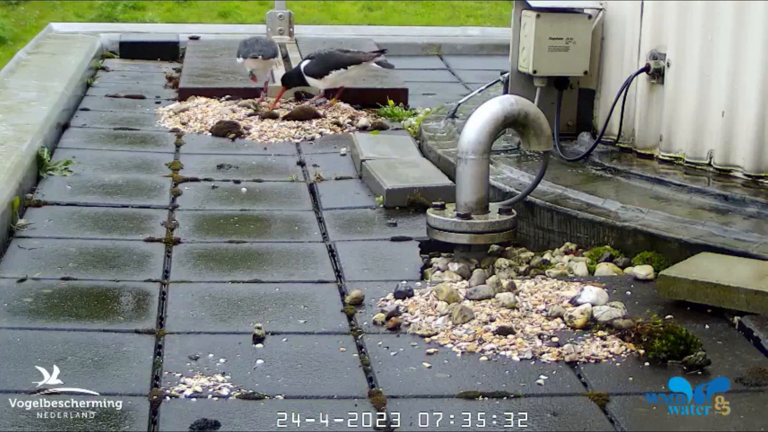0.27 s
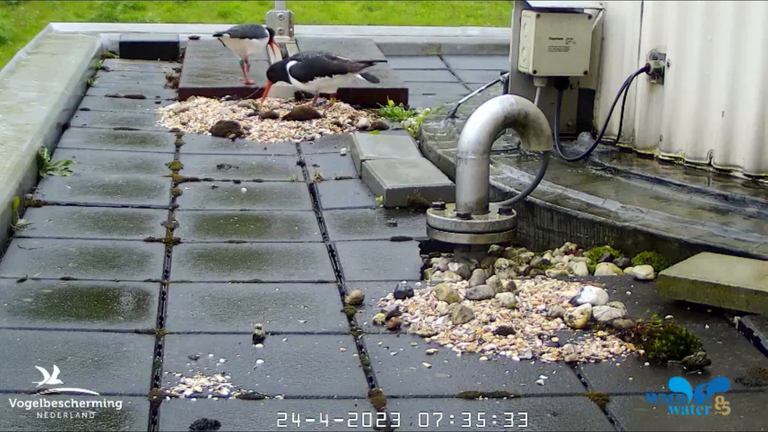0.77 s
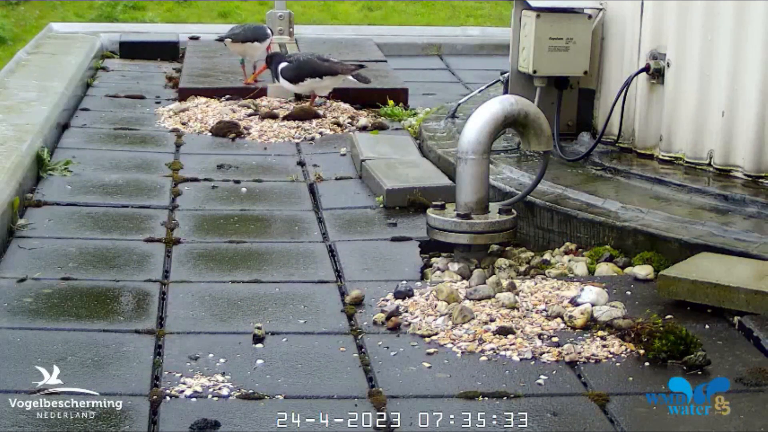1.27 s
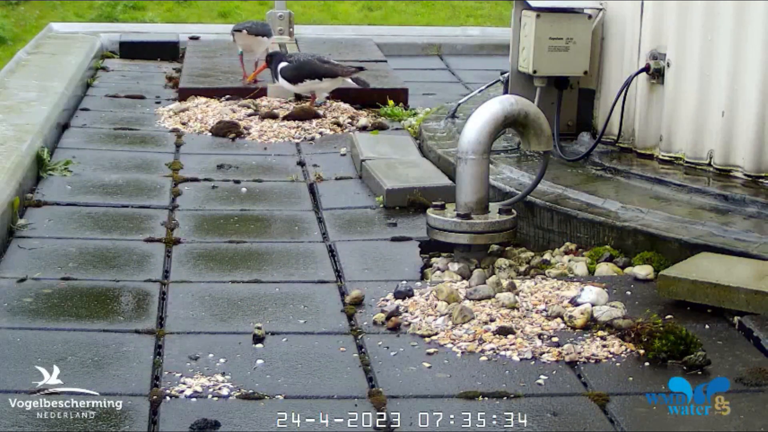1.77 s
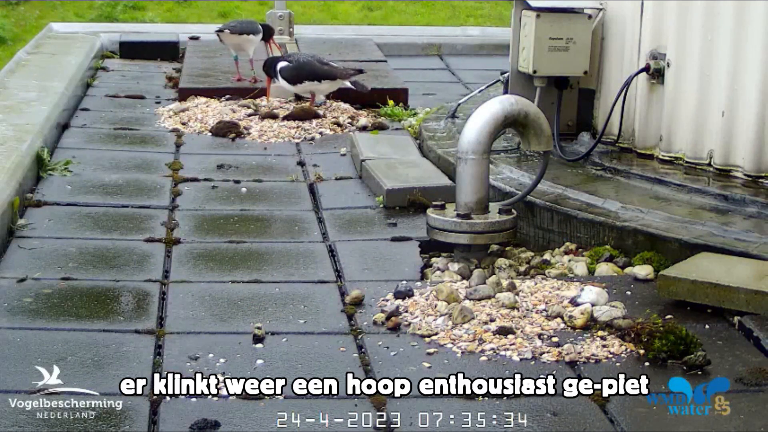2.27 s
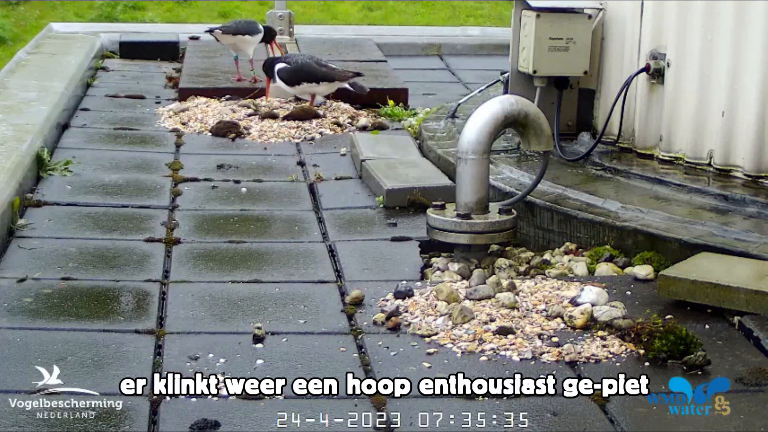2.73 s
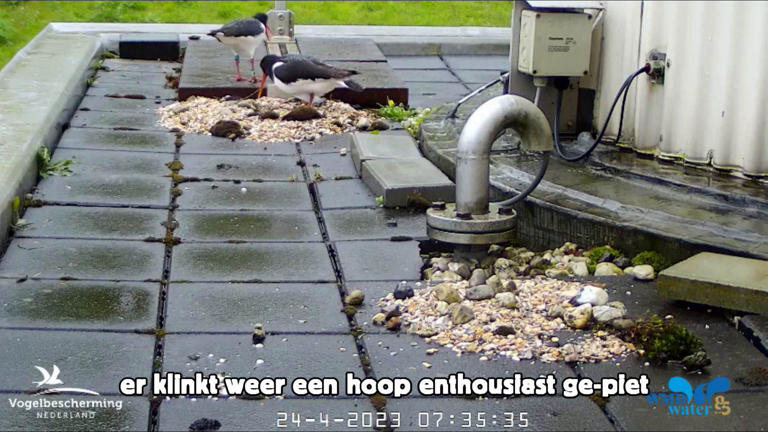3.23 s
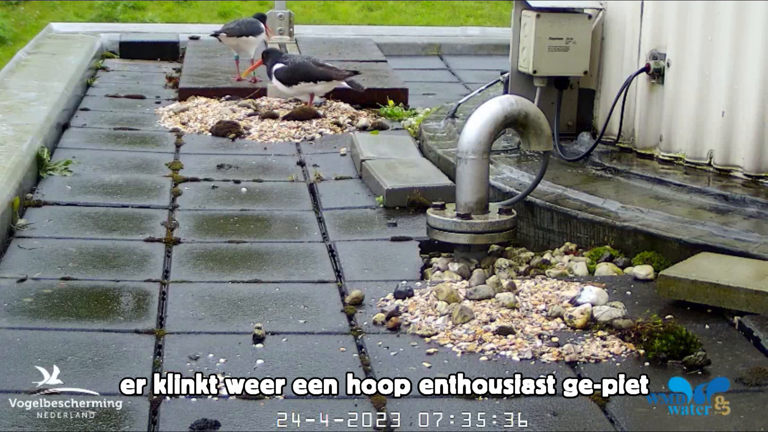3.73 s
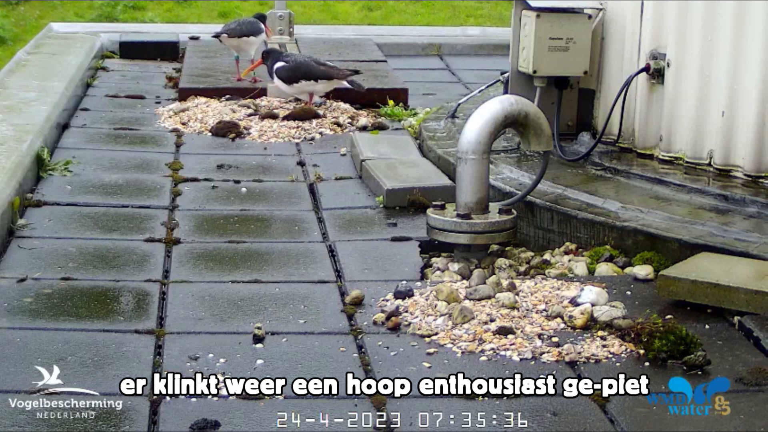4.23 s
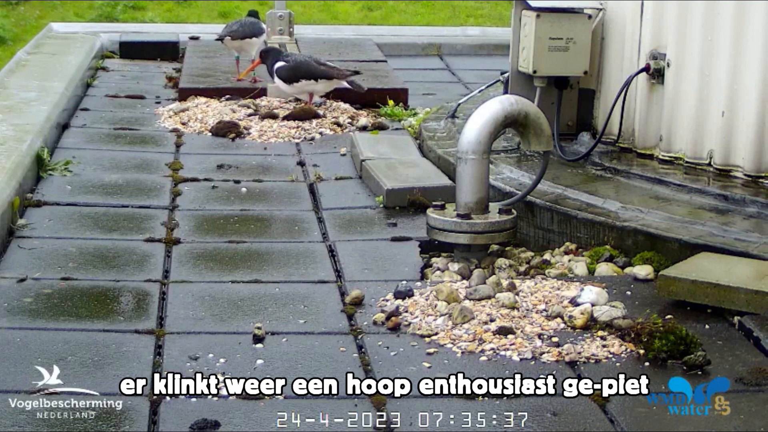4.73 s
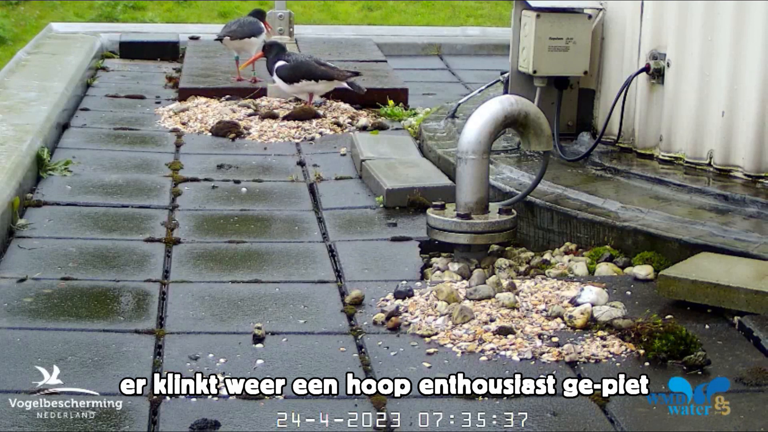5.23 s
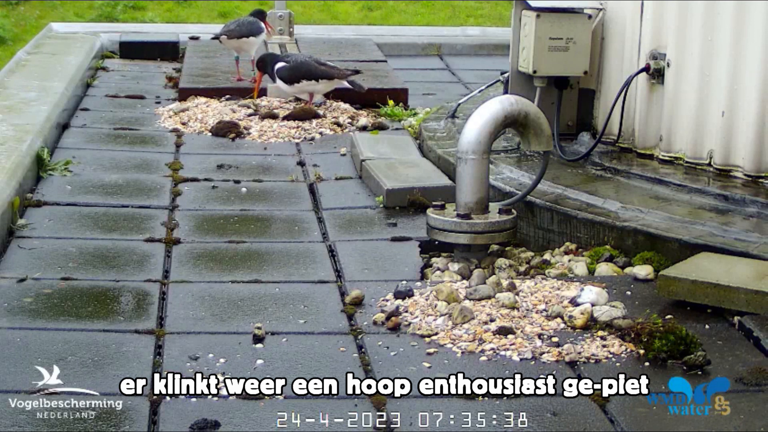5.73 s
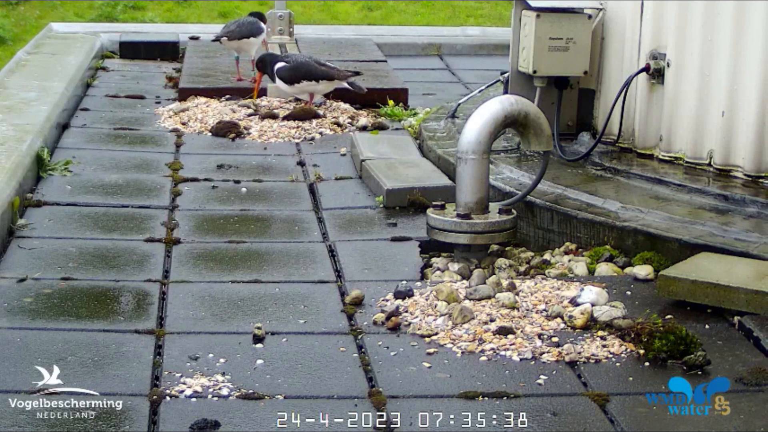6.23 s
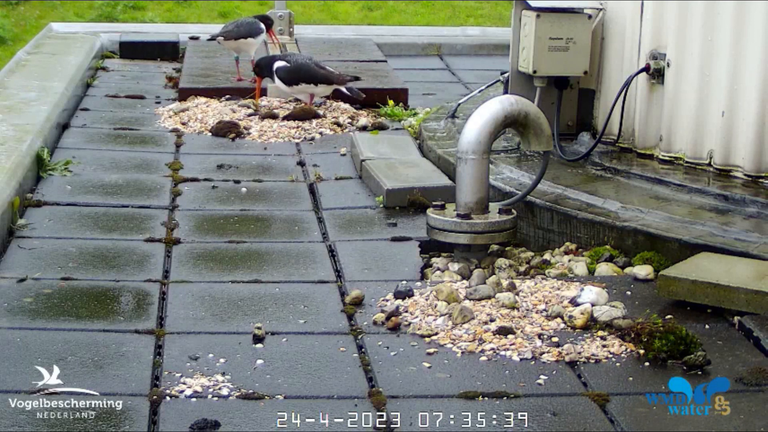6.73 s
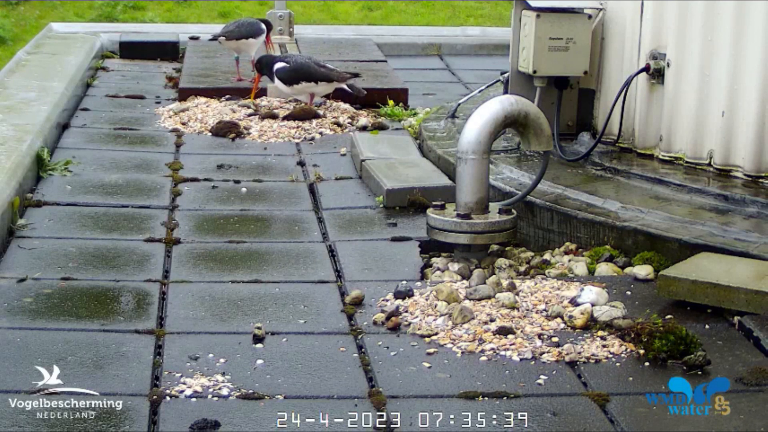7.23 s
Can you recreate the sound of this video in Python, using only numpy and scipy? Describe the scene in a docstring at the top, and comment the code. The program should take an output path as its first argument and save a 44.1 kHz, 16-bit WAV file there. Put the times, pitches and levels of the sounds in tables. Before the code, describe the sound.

Two oystercatchers pipe in frantic, shrill, reedy trills on an open paved roof, bursting into loud whistled peeps over faint traffic rumble.

```python
"""Oystercatchers piping on a roof

Two oystercatchers pipe at their nest on a flat paved roof, about fifteen notes a second.
Each pip is a stack of reedy overtones that scoops up and climbs; many flip into a loud, falling, whistled peep.
A wall, a parapet and scattered surfaces answer with short, delayed copies; grit ticks through a resonance.
Small birds are thin gliding tones, and traffic and air are shaped noise with a swelling rumble.
The treble ends near 8 kHz, with a faint mirror image just above."""
import sys
import numpy as np
from scipy import signal
from scipy.fft import rfft, irfft
from scipy.io import wavfile

SR = 44100
rng = np.random.default_rng(int(sys.argv[2]) if len(sys.argv) > 2 else 0)


def output_pcm(signal):
    """Save a mono or channel-first signal as 16-bit PCM at the path in sys.argv[1].

    Samples are clipped to [-1, 1] before scaling.
    """
    pcm = np.clip(np.atleast_2d(signal).T, -1, 1) * 32767
    wavfile.write(sys.argv[1], SR, np.round(pcm).astype(np.int16))


N = 330750  # length of the scene [samples]

# Colour of traffic and air: (frequency [Hz], relative level per Hz [dB])
AIR_SPECTRUM = [(20, -9.5), (40, -9), (60, -7), (115, 2.5), (200, -3.5), (300, -6), (480, -12.5),
                (700, -10.5), (1050, -17), (2000, -19.5), (3500, -26), (6000, -34.5), (7500, -34.5),
                (9000, -59)]
AIR_DB = -43  # level of the steady noise
# Swelling of the rumble, used relative to its average: (time [s], level [dB])
RUMBLE_SWELL = [(0.0, -42.5), (0.23, -40), (0.31, -47.5), (0.81, -40.5), (0.85, -49.5), (1.11, -43.5),
                (1.65, -45), (1.77, -37.5), (1.88, -46), (3.3, -47), (3.36, -43.5), (4.05, -46.5),
                (4.11, -41), (4.3, -48.5), (4.43, -38), (4.51, -46), (7.48, -44.5), (7.5, -48.5)]

# Thin whistles of small birds further off:
# (time [s], length [s], start pitch [Hz], end pitch [Hz], level before flutter [dB])
FAR_WHISTLES = [(0.11, .1, 7670, 6900, -63.5), (0.318, 0.27, 7630, 6800, -57.5),
                (.77, 0.14, 3740, 3740, -56), (1.598, 0.084, 3730, 3600, -50),
                (6.265, 0.2, 7400, 7250, -60.5), (6.453, 0.1, 7360, 6260, -59),
                (7.093, 0.37, 7450, 7100, -62)]

# Grit and shell pieces tapped by a bill: (time [s], peak level [dB], ring frequency [Hz])
GRIT_TICKS = [(0.064, -38, 5640), (3.414, -44, 5100), (5.629, -40, 2000), (5.852, -26, 6700),
              (6.346, -28, 2900), (7.002, -40, 6470)]

# Scattered echoes from paving, parapet and buildings: (delay [s], relative level [dB])
SCATTER_CURVE = [(.009, 8), (0.014, 2.5), (0.024, -5.5), (0.044, -17.5), (.065, -10.5), (0.086, -22),
                 (.16, -23.5), (.35, -44.5)]
SCATTER_DB = -17.5
WALL_S, WALL_DB, WALL_HZ = 0.0056, -8, 4000  # echo delay, level, and where its treble begins
PARAPET_S, PARAPET_DB = 0.0055, -7

# Plain notes that stay in the low voice:
# (time [s], length [s], top pitch [Hz], level before throat and swell [dB])
PLAIN_PIPS = [(-.008, 0.023, 1697, -35.5), (0.0536, 0.025, 1614, -31.5), (0.118, 0.026, 1595, -34.5),
              (0.1736, .023, 1570, -34), (0.2286, 0.018, 1665, -33.5), (0.345, 0.019, 1690, -34.5),
              (0.557, .022, 1695, -33.5), (.8545, 0.022, 1726, -32.5), (3.333, 0.016, 1730, -30.5),
              (3.382, .028, 1680, -31.5), (3.4443, 0.029, 1647, -31), (4.302, .022, 1680, -32.5),
              (4.3557, .018, 1630, -31), (4.5297, 0.023, 1760, -28.5), (4.5904, 0.026, 1696, -30.5),
              (4.72, 0.036, 1737, -30), (5.0178, 0.044, 1730, -27.5), (5.114, 0.032, 1615, -30),
              (5.297, .044, 993, -35.5), (5.3696, .029, 1724, -31), (5.432, 0.027, 1613, -30.5),
              (5.5018, 0.033, 1740, -30), (5.585, 0.032, 1594, -31), (5.6554, 0.03, 1730, -29.5),
              (5.7208, .03, 1586, -30.5), (5.887, 0.032, 1590, -30), (5.949, 0.058, 1614, -32),
              (6.1025, 0.027, 1316, -30.5), (6.178, 0.03, 1410, -30), (6.246, 0.053, 1610, -29.5),
              (6.394, 0.028, 1357, -34.5), (6.462, 0.024, 1377, -33.5), (6.524, 0.03, 1357, -35),
              (6.595, 0.033, 1361, -35), (6.676, 0.028, 1333, -32.5), (6.7513, 0.031, 1431, -33),
              (6.821, 0.036, 1349, -32), (6.895, .026, 1547, -28.5), (6.9476, 0.029, 1405, -32),
              (7.022, .028, 1408, -33.5), (7.0914, 0.049, 1637, -30), (7.1907, 0.028, 1703, -30),
              (7.254, 0.056, 1633, -30.5), (7.3647, 0.02, 1520, -32)]
# Throat and bill in the low voice: (frequency [Hz], gain [dB])
THROAT_GAIN = [(900, -8.5), (1400, 0), (2000, 0), (2700, 6), (3200, 3), (3700, -6), (4100, -0.2),
               (4500, -10), (5000, -18), (5500, -8.5), (6200, -23), (7200, -20.5), (8500, -39)]
# The low voice brightens and dulls as the birds turn and bow:
# (time [s], brightness [dB per octave], lift of the second harmonic [dB])
PIP_BRIGHTNESS = [(.05, -15, 6), (.25, -4, -3.5), (.42, 1.5, -4.5), (.6, -5, -3), (1, -0.5, -4),
                  (1.2, -11, 2.5), (1.5, -3.5, -5.5), (1.75, -13, 4), (2.1, 2, -3.5), (2.4, -1.5, 2),
                  (3, 2.8, -1.5), (3.15, -6, -1), (4.3, -5.5, -1.5), (4.88, -7.5, -1.5), (5.12, -2, -2),
                  (5.18, -3, -0.5), (5.3, -10, 5.5), (5.36, -1.5, -1), (5.7, -1, -2), (5.95, -2.5, -2.5),
                  (6.04, -8, -5), (6.11, -2, -3.5), (6.18, -4, -5.5), (6.25, -1.5, 1.5), (6.39, 1, 3),
                  (6.74, -1, 1), (6.83, -3, -5.5), (7.02, 1, -3.5), (7.28, -2, -4.5), (7.38, -16, 0)]
# How the low voice is held: (time [s], resting pitch [Hz], share of a plain pip passed at its top [0 to 1])
PIP_POSTURE = [(0, 1376, 0.73), (.9, 1416, 0.74), (1.2, 1446, .65), (3.4, 1474, 0.61), (4.6, 1432, 0.55),
               (5.2, 1464, 0.53), (5.3, 821, 0.67), (5.36, 1433, .55), (5.75, 1437, 0.55),
               (6.25, 1397, 0.67), (6.39, 1360, .48), (7.02, 1400, 0.58), (7.09, 1437, 0.7),
               (7.25, 1330, 0.71), (7.45, 1400, 0.54)]
# The pip that leads into a peep:
# (time [s], level before throat and swell [dB], pitch at which the voice flips [Hz])
LEAD_IN_PIPS = [(.3, -34, 1847), (1, -32, 1808), (1.3, -32, 1740), (1.75, -29.5, 1890), (2.05, -26.5, 1950),
                (2.3, -31.5, 1723), (3, -30, 1805), (3.6, -30, 1756), (3.85, -26, 1880), (4.2, -28, 1774),
                (4.45, -31, 1790), (4.85, -21.5, 1970), (5.22, -30, 1764), (5.82, -29.5, 1850),
                (6.06, -25, 2040), (7.4, -23, 1990)]
LEAD_IN_CREST = 0.92  # a pip that leads into a peep climbs almost to its end
CLIMB_S = 0.01012  # time scale of the climb from resting pitch to top
WAKE_S = 0.002  # the membranes stir faintly this long before a pip speaks

# Notes that flip from a pip into a peep:
# (time of the flip [s], how long before the flip its pip begins [s], peep length [s],
#  peep pitch [Hz], peep level [dB])
FLIPPED_PEEPS = [(.302, 0.018, 0.013, 2344, -26.5), (.417, 0.017, 0.013, 2350, -30),
                 (0.47, 0.019, 0.0078, 2420, -28.5), (0.519, .014, 0.011, 2350, -29.5),
                 (0.634, 0.018, 0.013, 2340, -38), (0.695, 0.024, 0.0051, 2280, -34),
                 (.751, 0.018, 0.0093, 2410, -30), (0.812, 0.019, .012, 2340, -33.5),
                 (0.937, .019, 0.0085, 2380, -29), (0.989, 0.013, .014, 2510, -25),
                 (1.0492, 0.015, 0.016, 2450, -27), (1.1085, 0.014, 0.014, 2570, -25.5),
                 (1.165, 0.013, 0.016, 2567, -26), (1.2193, 0.01, 0.022, 2552, -27.5),
                 (1.2786, .01, 0.024, 2550, -27), (1.3392, 0.016, 0.024, 2560, -28.5),
                 (1.4032, 0.013, 0.0082, 2466, -25), (1.4583, 0.013, .011, 2516, -25.5),
                 (1.5118, 0.011, .013, 2520, -24), (1.5704, 0.012, 0.016, 2507, -25),
                 (1.629, .01, 0.016, 2521, -22), (1.688, 0.011, 0.018, 2523, -23.5),
                 (1.7464, 0.0094, 0.014, 2480, -21), (1.803, 0.0085, .023, 2515, -23.5),
                 (1.866, 0.0077, 0.028, 2505, -23.5), (1.946, 0.018, 0.0061, 2000, -32.5),
                 (2.005, 0.019, 0.0046, 2150, -39), (2.0593, 0.017, .012, 2490, -24),
                 (2.116, 0.015, 0.016, 2510, -25), (2.1758, 0.015, 0.013, 2480, -21.5),
                 (2.243, 0.016, 0.015, 2520, -19.5), (2.3073, 0.012, 0.019, 2470, -20),
                 (2.373, .013, 0.014, 2533, -20.5), (2.434, 0.014, 0.018, 2477, -19),
                 (2.5036, 0.013, 0.017, 2512, -20), (2.572, 0.013, 0.015, 2553, -19.5),
                 (2.6374, 0.014, 0.02, 2572, -19), (2.709, 0.012, 0.013, 2495, -18.5),
                 (2.77, 0.012, .015, 2534, -21.5), (2.836, 0.014, 0.014, 2507, -18.5),
                 (2.897, 0.014, 0.014, 2532, -19), (2.9606, 0.014, .0126, 2510, -19),
                 (3.0225, 0.013, 0.02, 2608, -23.5), (3.093, .015, 0.012, 2496, -25),
                 (3.1532, 0.016, 0.016, 2140, -34.5), (3.2124, 0.017, 0.011, 2350, -28.5),
                 (3.276, 0.021, .013, 2442, -22.5), (3.5284, 0.016, 0.013, 2140, -30.5),
                 (3.6034, 0.028, 0.012, 2160, -34), (3.807, 0.0092, 0.02, 2310, -24),
                 (3.853, 0.0062, .017, 2326, -24.6), (3.9222, 0.012, 0.019, 2530, -23.5),
                 (4.005, 0.013, .0146, 2412, -23), (4.0695, 0.012, 0.027, 2507, -23.5),
                 (4.1628, .013, 0.013, 2414, -22), (4.232, 0.018, .0165, 2406, -23),
                 (4.452, 0.028, 0.02, 2390, -24), (4.6746, .012, .015, 2398, -18.5),
                 (4.8174, 0.0084, 0.017, 2187, -21.5), (4.889, 0.0089, 0.018, 2178, -20),
                 (4.957, 0.011, 0.015, 2210, -20), (5.214, 0.034, 0.013, 2040, -37),
                 (5.817, 0.027, 0.021, 2250, -30.5), (6.0582, 0.012, 0.01, 2140, -30.5),
                 (7.429, 0.01, 0.015, 2040, -22), (7.4907, 0.0067, 0.011, 2096, -23.5)]
# Overtones of a peep at the usual pitch: (time [s], second harmonic [dB], third harmonic [dB])
PEEP_OVERTONES = [(.3, -10, -21), (1.05, -9, -20.5), (1.2, -4, -19.5), (1.5, -9.5, -18.5),
                  (1.7, -15.5, -21), (1.87, -13.5, -15), (2.06, -10.5, -29.5), (2.6, -9.5, -23.5),
                  (2.85, -11.5, -29.5), (3.85, -12, -25.5), (4.07, -12, -22.5), (4.16, -15, -26.5),
                  (4.45, -14.5, -22.5), (4.7, -18.5, -40), (4.96, -18.5, -29), (5.8, -13, -27.5),
                  (7.45, -7.5, -5.5)]
# How far a peep falls before it ends: (time [s], share of its pitch [0 to 1])
PEEP_DROP = [(.3, 0.24), (.93, 0.22), (1, 0.099), (1.33, 0.12), (1.45, .17), (1.65, 0.14), (2.5, 0.15),
             (3.2, 0.19), (4.5, .16), (4.88, .08), (5.8, 0.17)]
USUAL_PEEP_HZ = 2450
SECOND_DB_PER_HZ, THIRD_DB_PER_HZ = 0.0189, 0.0653  # a higher peep is a shriller one
BREAK_S, LOUD_PEEP_DB = 0.0032, -20  # silence before a peep of this level; shorter before a softer one
PEEP_FADE_DB = 1.5  # a peep loses this much from its start to its end

# Low-rate sampling: how much passes at the top of the band: (frequency [Hz], gain [dB])
MIRROR_FILTER = [(7600, 0), (8000, -4), (8300, -8), (8600, -17), (9000, -33), (9400, -55)]
SAMPLING_HZ, INPUT_EDGE_HZ, CUTOFF_HZ = 16000, 7850, 9200


def from_db(db):
    """Turn decibels into gain."""
    return 10 ** (np.asarray(db) / 20)


def rms_one(x):
    """Scale a sound to an average strength (rms) of 1."""
    return x / np.sqrt(np.mean(x ** 2) + 1e-20)


def at_hz(points, hz):
    """Read a spectrum on a log-frequency axis."""
    freqs, levels = np.transpose(points)
    return np.interp(np.log(np.maximum(hz, 1)), np.log(freqs), levels)


def at_time(rows, s):
    """Read every column of a curve at the given time."""
    times, *columns = np.transpose(rows)
    return [np.interp(s, times, column) for column in columns]


def bins_hz():
    """Frequencies in a spectrum of the whole scene."""
    return np.arange(N // 2 + 1) * SR / N


def drift(rate):
    """Smooth random wandering with rms 1; a higher rate [Hz] makes it quicker."""
    smoothed = rfft(rng.standard_normal(N)) / (1 + (bins_hz() / rate) ** 2)
    return rms_one(irfft(smoothed, N))


def note_clock(start, length):
    """Samples of a note, its age in seconds and its progress from 0 to 1."""
    first = max(int(start * SR) + 1, 0)
    at = np.arange(first, min(int((start + length) * SR), N))
    age = at / SR - start
    return at, age, np.clip(age / length, 0, 1)


def phase_of(hz):
    """Add up a pitch curve into a running phase."""
    return 2 * np.pi * np.cumsum(hz) / SR


def delayed(x, delay_s):
    """The same sound, arriving later."""
    return np.interp(np.arange(N) - delay_s * SR, np.arange(N), x, left=0)


def air(surge_db=2.0, rumble_hz=330, swell_share=0.67):
    """Traffic and air: a steady hiss over a low rumble that swells and ebbs."""
    noise = irfft(rfft(rng.standard_normal(N)) * from_db(at_hz(AIR_SPECTRUM, bins_hz())), N)
    noise = rms_one(noise)
    rumble = signal.sosfilt(signal.butter(1, rumble_hz, fs=SR, output="sos"), noise)
    level_db, = at_time(RUMBLE_SWELL, np.arange(N) / SR)
    swell_db = swell_share * (level_db - level_db.mean()) + surge_db * drift(6.9)
    # only the change in the rumble is added, since the noise already holds it
    return from_db(AIR_DB) * (noise + rumble * (from_db(swell_db) - 1))


def small_birds(jitter=0.028, flutter_db=3.0, shrill_hz=7400):
    """Faint, fluttering whistles, level or slowly sinking; the shrill ones waver most."""
    out = np.zeros(N)
    waver, flutter = jitter * drift(230), flutter_db * drift(120)
    for start, length, first_hz, last_hz, db in FAR_WHISTLES:
        at, age, progress = note_clock(start, length)
        glide = first_hz + (last_hz - first_hz) * progress
        pitch = glide * (1 + waver[at] * (first_hz / shrill_hz) ** 2)
        swell = from_db(db + flutter[at]) * np.sin(np.pi * progress)
        out[at] += swell * np.sin(phase_of(pitch))
    return out


def ticks(decay_s=0.0013, sharpness=3.4):
    """Each tap on grit is a tiny crack of noise through one broad resonance."""
    out, noise = np.zeros(N), rng.standard_normal(N)
    for start, db, hz in GRIT_TICKS:
        at, age, _ = note_clock(start, 10 * decay_s)
        crack = noise[at] * np.exp(-age / decay_s)
        ring = signal.lfilter(*signal.iirpeak(hz, sharpness, fs=SR), crack)
        out[at] += from_db(db) * ring / np.abs(ring).max()
    return out


def scattered(x, dull_hz=8000):
    """Many surfaces return a thin, slightly dull spray of late echoes."""
    delay, db = np.transpose(SCATTER_CURVE)
    t = np.arange(SR // 2) / SR
    within = (t > delay[0]) * (t < delay[-1])
    echoes = rng.standard_normal(len(t)) * from_db(np.interp(t, delay, db)) * within
    echoes = signal.sosfilt(signal.butter(1, dull_hz, fs=SR, output="sos"), echoes)
    return signal.fftconvolve(x, echoes / np.linalg.norm(echoes))[:N]


def wall_echo(x):
    """The open bill beams its treble forward, so the near wall answers brightly."""
    bright = signal.sosfilt(signal.butter(3, WALL_HZ, "high", fs=SR, output="sos"), x)
    return from_db(WALL_DB) * delayed(bright, WALL_S)


def parapet_echo(x):
    """The low parapet returns one full copy, which doubles each sweep."""
    return from_db(PARAPET_DB) * delayed(x, PARAPET_S)


def all_pips():
    """All pips: (time [s], length [s], top pitch [Hz], level [dB], share passed at the top [0 to 1])."""
    rows = [(start, *row, at_time(PIP_POSTURE, start)[1]) for start, *row in PLAIN_PIPS]
    for flip, lead, _, _, db in FLIPPED_PEEPS:
        pause = min(BREAK_S * from_db(db - LOUD_PEEP_DB), lead / 2)
        lead_db, flip_hz = at_time(LEAD_IN_PIPS, flip)
        rows.append((flip - lead, lead - pause, flip_hz, lead_db, LEAD_IN_CREST))
    return rows


def pips(scoop=0.4244, scoop_s=0.003884, attack_s=0.0027, release=2.8, sag=0.23, droop=2.4,
         push_db=1.7, closing_db=1.5, jitter=0.009, shimmer_db=2.04, rasp_db=0.72, count=7):
    """Reedy notes scoop up and swell as they climb, then sag and dull as the pressure goes."""
    out = np.zeros(N)
    k = np.arange(1, count + 1)[:, None]  # harmonic numbers
    waver, flutter, rasp = 1 + jitter * drift(250), shimmer_db * drift(360), rasp_db * drift(400)
    for start, length, top_hz, db, crest in all_pips():
        at, age, progress = note_clock(start - WAKE_S, length + WAKE_S)
        bright, lift_db = at_time(PIP_BRIGHTNESS, start)
        rest_hz = min(at_time(PIP_POSTURE, start)[0], top_hz)
        climb = np.exp(-(np.minimum(progress - crest, 0) * length / CLIMB_S) ** 2)
        spent = (2 * np.maximum(progress - crest, 0)) ** droop  # grows once the top has passed
        pressure = 1 - scoop * np.exp(-age / scoop_s) - sag * spent
        pitch = (rest_hz + (top_hz - rest_hz) * climb) * pressure * waver[at]
        slope = bright - closing_db * spent + rasp[at]  # the membranes close unevenly
        loudness = db + push_db * (climb - 0.5) + flutter[at]
        levels = loudness + at_hz(THROAT_GAIN, k * pitch) + np.log2(k) * slope + (k == 2) * lift_db
        tone = -(from_db(levels) * np.cos(k * phase_of(pitch))).sum(0)
        out[at] += tone * (1 - np.exp(-age / attack_s)) ** 2 * (1 - progress ** release)
    return out


def peeps(scoop=0.085, scoop_s=0.0016, attack_s=0.00057, droop=3.8, release=6.5,
          jitter=0.007, shimmer_db=2.04, closing_db=3.5, count=3):
    """Whistles snap on, hold and sag; higher ones are shriller, and the overtones fade first."""
    out = np.zeros(N)
    k = np.arange(1, count + 1)[:, None]  # harmonic numbers
    waver, flutter = 1 + jitter * drift(300), shimmer_db * drift(260)
    for start, _, length, hz, db in FLIPPED_PEEPS:
        at, age, progress = note_clock(start, length)
        second_db, third_db = at_time(PEEP_OVERTONES, start)
        fall, = at_time(PEEP_DROP, start)
        strain = hz - USUAL_PEEP_HZ
        second_db += SECOND_DB_PER_HZ * strain
        third_db += THIRD_DB_PER_HZ * strain
        overtones = np.array([[0], [second_db], [third_db]])
        pitch = hz * (1 - fall * progress ** droop) * (1 - scoop * np.exp(-age / scoop_s)) * waver[at]
        loudness = db - PEEP_FADE_DB * (progress - 0.5) + flutter[at]
        levels = loudness + overtones - closing_db * (k - 1) * progress ** 4
        tone = -(from_db(levels) * np.cos(k * phase_of(pitch))).sum(0)
        out[at] += tone * (1 - np.exp(-age / attack_s)) * (1 - progress ** release)
    return out


def scene(far_wet_db=-10.5):
    """The pair on the roof and the more echoing far birds, over the outdoor background."""
    background, far = air(), small_birds()
    reedy = pips()  # given bill down, close to the low parapet
    pair = reedy + peeps()
    echoes = scattered(from_db(SCATTER_DB) * pair + from_db(far_wet_db) * far)
    sound = background + far + ticks() + echoes + wall_echo(pair) + parapet_echo(reedy) + pair
    return sound[None]


def record(dry):
    """Low-rate sampling ends the treble near 8 kHz and mirrors the top of the band faintly above it."""
    band = signal.sosfilt(signal.ellip(9, 0.2, 50, INPUT_EDGE_HZ, fs=SR, output="sos"), dry)
    # multiplying by the sampling tone makes the mirror image
    sampled = band * (1 + 2 * np.cos(2 * np.pi * SAMPLING_HZ * np.arange(N) / SR))
    smoothed = irfft(rfft(sampled) * from_db(at_hz(MIRROR_FILTER, bins_hz())), N)
    return signal.sosfilt(signal.ellip(10, 0.1, 80, CUTOFF_HZ, fs=SR, output="sos"), smoothed)


dry = scene()
out = record(dry)
output_pcm(out)
```